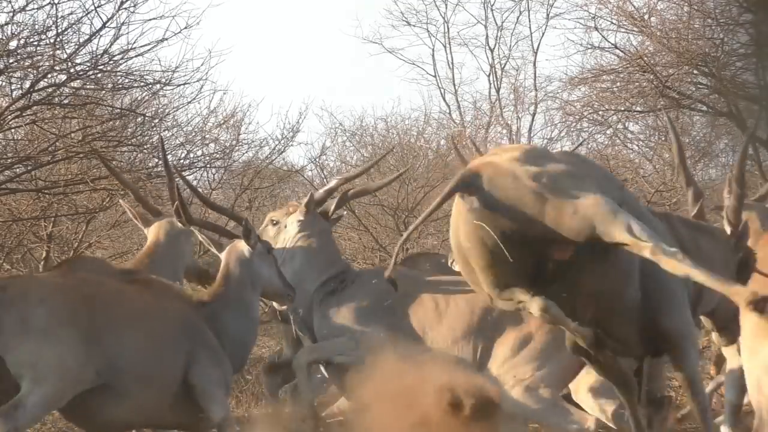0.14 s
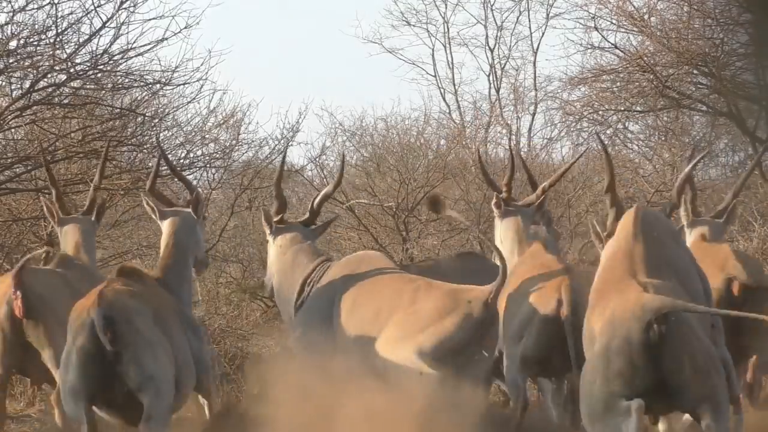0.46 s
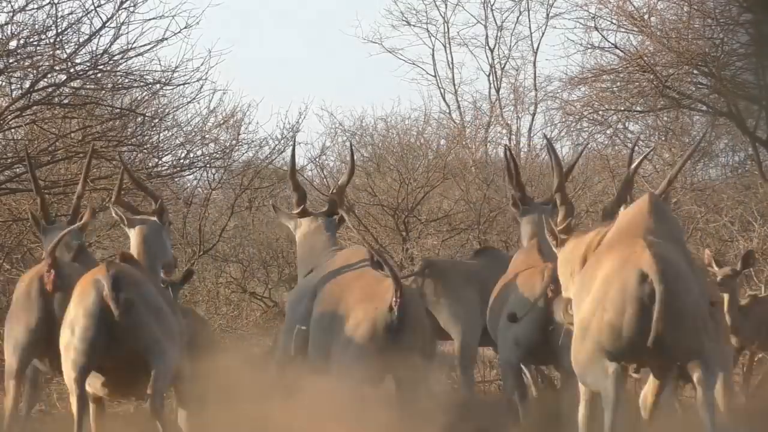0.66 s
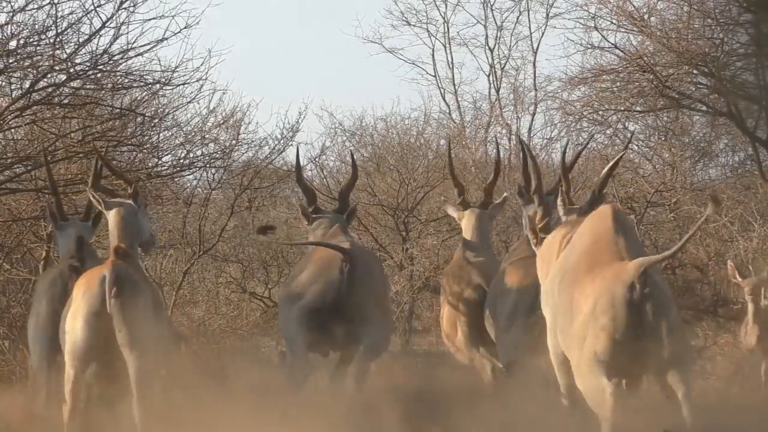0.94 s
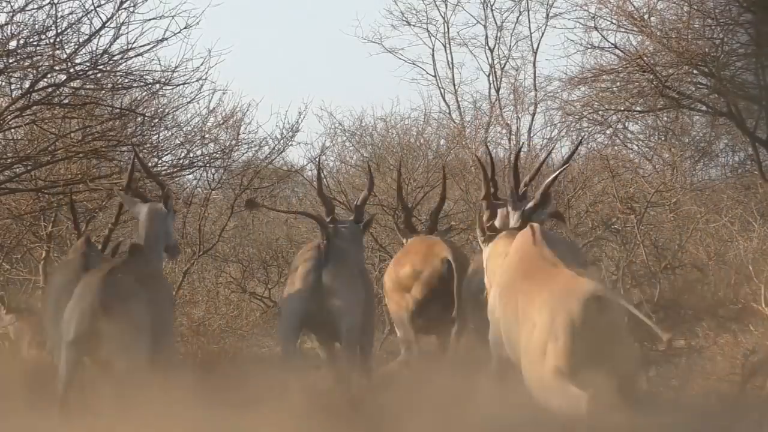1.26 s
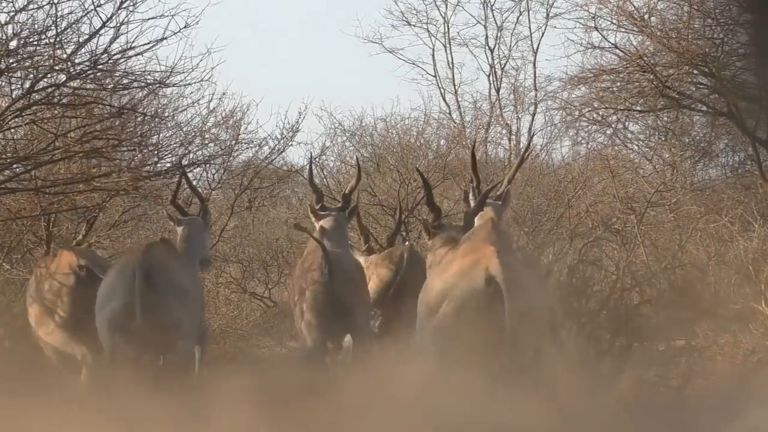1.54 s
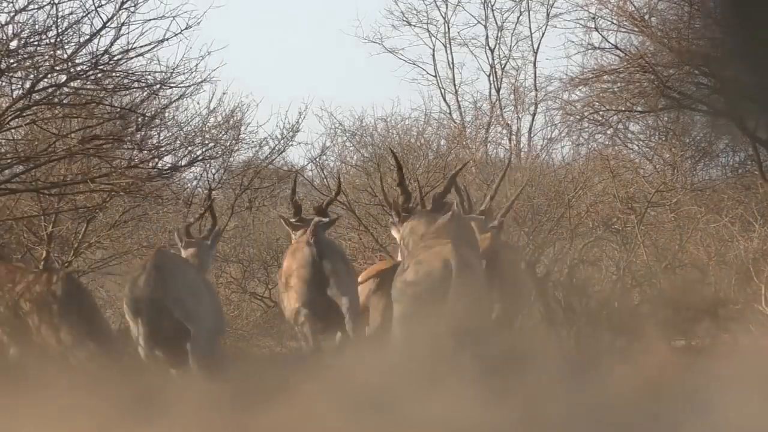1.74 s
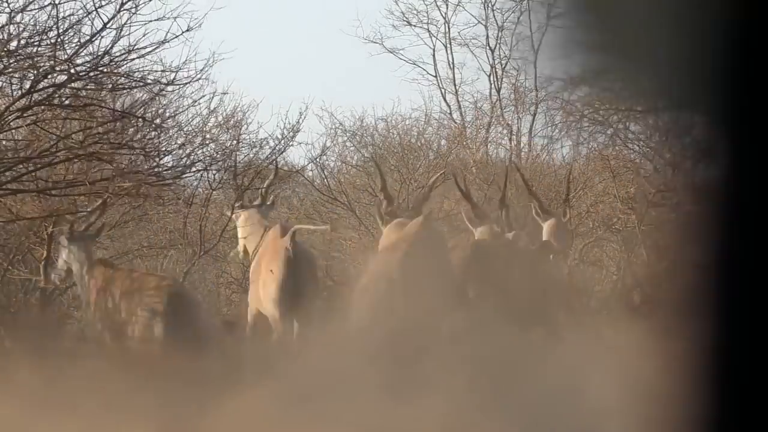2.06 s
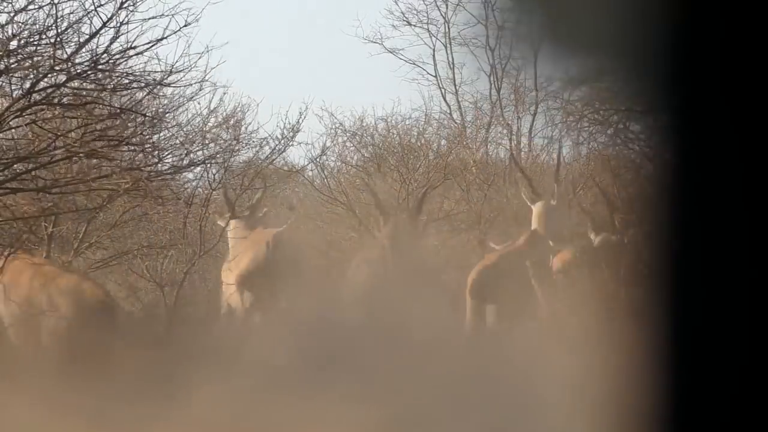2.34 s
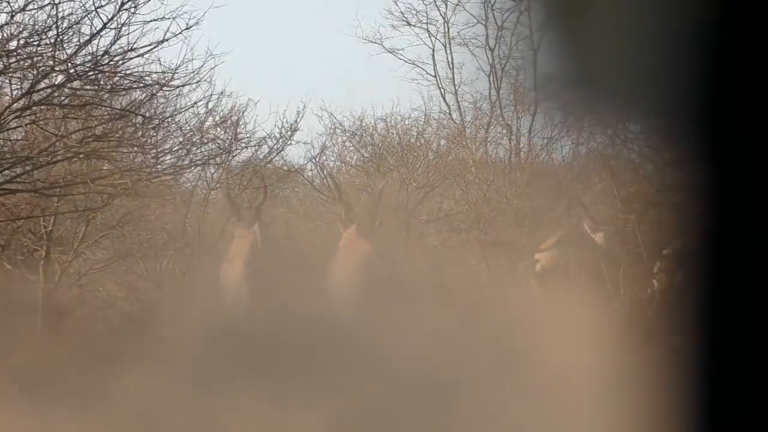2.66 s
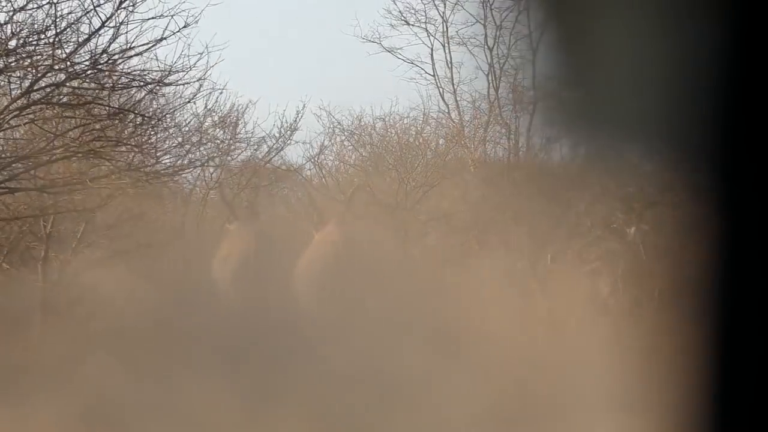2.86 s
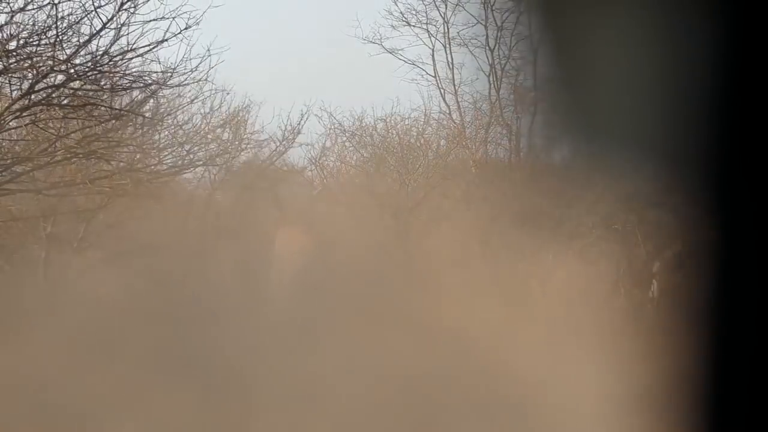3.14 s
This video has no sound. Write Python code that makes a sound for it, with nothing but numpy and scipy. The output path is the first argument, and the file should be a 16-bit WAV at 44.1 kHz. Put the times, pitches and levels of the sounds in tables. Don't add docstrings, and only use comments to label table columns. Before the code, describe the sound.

A herd of large antelope stampedes off through dry bush: dense low hoof thuds, crackling brush and snapping twigs, one sharp loud branch crack early on, then thinning rustle and faint bird chirps; close outdoor stereo microphone with light hiss.

```python
import sys
import numpy as np
from scipy import signal
from scipy.io import wavfile

SR = 44100
rng = np.random.default_rng(int(sys.argv[2]) if len(sys.argv) > 2 else 0)


def field_ratio(decibels):
    return 10 ** (np.asarray(decibels, dtype=float) / 20)


def master_out(mix):
    frames = np.transpose(np.atleast_2d(mix))
    ceiling = np.clip(frames, -1, 1)
    pcm = np.round(ceiling * 32767).astype(np.int16)
    wavfile.write(sys.argv[1], SR, pcm)


N = 145530

# start in seconds, boom level in dB, knock level in dB.
HOOF_FALLS = [(0.051, -40, -56), (0.194, -40, -36), (0.323, -33, -43), (0.374, -39, -40.5),
              (0.405, -42, -52), (0.463, -32.5, -31), (0.505, -39, -39), (0.576, -61, -36.5),
              (0.656, -34.5, -51), (0.782, -43, -58), (0.9, -51, -40), (0.98, -45, -42), (1.062, -34, -54),
              (1.16, -47, -43), (1.21, -35, -43), (1.26, -29, -36), (1.407, -58, -39), (1.483, -33.5, -43),
              (1.548, -35, -36), (1.637, -31, -48), (1.675, -35.5, -44.5), (1.766, -43, -49),
              (1.845, -46, -43), (1.885, -46, -40), (1.92, -42, -40), (1.973, -50, -41),
              (2.042, -48, -37.5), (2.11, -36, -53), (2.235, -52, -47), (2.45, -55, -46),
              (2.596, -52, -40.5), (2.74, -55, -44), (2.99, -55, -45), (3.143, -55, -44)]
# pitch in Hz, level in dB, decay by 60 dB in seconds.
CRUST_MODES = [(174, -1, .06), (206, 2, 0.065), (250, -2.5, .045), (323, -11.5, 0.018), (398, -21, 0.03)]
# time in seconds, level in dB.
TRAMPLE_LEVEL = [
    (0.0, -44.5),
    (1.81, -43.5),
    (3.3, -48),
]
# start in seconds, level in dB.
BRANCH_CRACKS = [
    (0.762, -26),
    (.7664, -12),
    (0.7673, -15.5),
    (0.7696, -37),
    (0.777, -23.5),
]
# pitch in Hz, level in dB, decay by 60 dB in seconds.
BRANCH_RINGING = [(1300, -11, .005), (1900, -6, .005), (2480, -5, .005), (3100, -3, .006), (4350, -3, .01),
                  (5100, -8, .005), (5680, -6, .005), (6340, 0, .007), (7560, -9, .006), (9200, -9, .003),
                  (10700, -13, .003), (14000, -22, .002)]
# start in seconds, peak level in dB, pitch in Hz, level of the bright edge in dB.
TWIG_SNAPS = [(0.1036, -35, 2140, -26), (0.1766, -35, 1210, -10), (0.194, -32.5, 1460, -14),
              (0.3016, -34, 2060, -13), (0.3683, -33, 2980, -8), (0.4878, -32, 2290, -20),
              (0.4955, -29.5, 2360, -6), (0.5736, -30, 2900, -25), (0.598, -34, 2610, -17),
              (0.6871, -29.5, 2470, -8), (1.0188, -27.5, 2200, -25), (1.074, -27, 1800, -8),
              (1.1765, -34, 3500, -25), (1.198, -31, 2500, -15), (1.264, -31.5, 2300, -24),
              (1.4357, -21.5, 1820, -21), (1.5271, -30, 1080, -15), (1.5499, -23.5, 2820, -22),
              (1.6225, -25, 2930, -34), (1.702, -24, 1530, -26), (1.7753, -24, 2280, -24),
              (1.8347, -32, 1290, -15), (1.945, -24, 2330, -23), (2.2307, -30.5, 1430, -21),
              (2.4086, -44, 1240, -30), (2.7267, -30, 2540, -23), (2.8614, -35, 985, -29),
              (2.907, -32, 2200, -28.5), (3.0353, -35.5, 1280, -21)]
# start in seconds, peak level in dB, pitch in Hz.
STONE_TICKS = [(.0687, -37, 1560), (.113, -37, 4000), (.2708, -33, 1660), (.3267, -37, 8690),
               (.3676, -34, 4780), (.4948, -25, 6340), (.6863, -26, 6380), (.7068, -31, 2360),
               (.732, -36, 9500), (.9448, -34, 1240), (1.0252, -28, 3700), (1.034, -28, 2900),
               (1.043, -30, 3200), (1.0745, -28, 3000), (1.079, -27, 1400), (1.111, -35, 6700),
               (1.1815, -29, 1900), (1.1902, -19, 3290), (1.1905, -23, 5600), (1.22, -31, 3400),
               (1.255, -31, 2900), (1.3418, -33, 6590), (1.3942, -31, 3230), (1.44, -27, 1050),
               (1.454, -29, 2000), (1.4651, -33, 5040), (1.5279, -30, 8730), (1.5873, -28, 2050),
               (1.6142, -35, 9000), (1.6222, -24, 3400), (1.6245, -27, 1500), (1.675, -31, 1400),
               (1.807, -31, 1300), (1.853, -31, 2100), (1.8736, -33, 5640), (1.88, -29, 1250),
               (1.896, -29, 1150), (1.9445, -28, 3900), (2.0018, -29, 3380), (2.0393, -30, 1560),
               (2.1321, -34, 8100), (2.3431, -36, 3400), (2.3885, -32, 2060), (2.5546, -35, 8570),
               (2.728, -31, 1150), (2.83, -27, 3550), (2.8305, -33, 5500), (2.832, -36, 1200),
               (2.8799, -33, 2230), (3.0091, -31, 2370), (3.018, -33, 3300), (3.1033, -38, 4850),
               (3.1443, -35, 3590), (3.1737, -34, 2340), (3.2, -34, 2500), (3.294, -33, 1400)]
# start in seconds, length in seconds, start pitch in Hz, end pitch in Hz, level in dB.
BIRD_CHIRPS = [(1.905, .034, 3050, 2200, -43), (2.305, .02, 3050, 2150, -44), (2.46, .026, 2900, 1950, -44),
               (2.517, .016, 3000, 2350, -45), (2.537, .024, 2850, 1950, -44.5),
               (2.572, .018, 2100, 1780, -45), (2.652, .045, 4300, 2650, -50),
               (2.685, .05, 2720, 2580, -49.5), (2.875, .025, 3950, 3500, -53),
               (2.912, .04, 2300, 1300, -48), (3.005, .018, 2900, 2200, -47), (3.215, .03, 2950, 2350, -47)]
# time of the peak in seconds, level in dB.
LEAF_SWEEPS = [(.09, -46), (.375, -45.5), (.51, -42), (1.085, -47), (1.22, -50), (1.47, -43.5), (1.55, -49),
               (1.76, -45), (1.88, -42), (1.97, -47), (2.135, -44.5), (2.555, -46.5), (3.02, -53)]
# time in seconds, level in dB.
BRUSH_LEVEL = [
    (0.0, -46),
    (1.76, -41.5),
    (2.1, -43),
    (3.3, -45.5),
]
# frequency in Hz, level in dB per Hz.
RUSTLE_COLOUR = [(400, -28), (620, -7), (800, -18.5), (1100, 0.5), (2500, -0.5), (4200, -5.5),
                 (6500, -15.5), (12000, -14)]
# time in seconds, level in dB.
DUST_LEVEL = [
    (0.0, -55.5),
    (1.9, -56),
    (2.7, -58.5),
    (3.3, -59.5),
]
# frequency in Hz, level in dB per Hz.
AIR_COLOUR = [(30, -29), (100, 6), (500, 0), (800, -16), (4000, -30.5), (9000, -4), (14000, -23),
              (17000, -34)]
# frequency in Hz, share from 0 to 1.
STEREO_LIKENESS = [(40, 0.74), (200, 0.6), (800, 0.94), (2500, 0.64), (5000, 0.83), (9000, 1),
                   (14000, 0.92)]

BOOM_HZ, BOOM_T60_S, BOOM_DB, KNOCK_DB = 91.7, 0.13, 1.5, 3
PUSH_S, BOOM_PAN_DB = 0.009, -1.4
FALLS_PER_S, FALL_SPREAD_DB, HERD_BOOM_DB, HERD_KNOCK_DB = 400, 2.2, -6.5, -3.5
BRANCH_PAN_DB, BRANCH_WET_DB = -1.3, -7.5
SPLINTERS_PER_S, SPLINTER_DB, SPLINTER_T60_S = 2800, -25.5, 0.15
SHRED_DB, SHRED_T60_S, SHRED_LOW_HZ, SHRED_HIGH_HZ = -30, 0.2, 2600, 8500
SNAP_CYCLES, SNAP_DB, SPLIT_S, SPLIT_LOSS_DB = 14.0, 2, 0.002, 8
CRUNCH_DB, CRUNCH_T60_S = -15, 0.16
BRIGHT_HZ, BRIGHT_DB, EDGE_T60_S = 8000, -3, 0.02
TICK_CYCLES, TICK_T60_S, TICK_DB, TICK_WET_DB = 15.0, 0.006, 1.5, -14
TICK_TILT_DB, REBOUND_S, REBOUND_DB = 3.0, 0.0012, -2
SWISH_RISE_S, SWISH_FALL_S, SWISH_LOW_HZ, SWISH_HIGH_HZ = 0.011, 0.028, 3930, 10500
CRACKLE_PER_S, CRACKLE_DB, CRACKLE_CYCLES, CRACKLE_SPREAD_DB = 1000, -5.5, 7.0, 3.0
RUSTLE_DB = -2
SCRUB_T60_S, SCRUB_DB, SCRUB_SIDE_DB, SCRUB_CUT_HZ, SCRUB_SIDE_HZ = 0.2, -8, -2, 9000, 4600
HOLLOW_HZ, TOP_HZ = 970, 15750


def rms_one(x):
    return x / np.sqrt(np.mean(x ** 2) + 1e-20)


def in_time(rows):
    return np.interp(np.arange(N) / SR, *np.transpose(rows))


def at_hz(points, hz):
    points = np.array(points)
    return np.interp(np.log(hz), np.log(points[:, 0]), points[:, 1])


def drift(rate):
    r = np.exp(-80 * np.pi * rate / SR)
    draws = rng.standard_normal(N // 40 + 2002)
    slow = signal.lfilter([1], [1, -2 * r, r * r], draws)[2000:]
    return np.interp(np.arange(N) / 40, np.arange(len(slow)), rms_one(slow))


def ring(clicks, hz, t60):
    r = field_ratio(-60 / (t60 * SR))
    w = 2 * np.pi * hz / SR
    return signal.lfilter([0, np.sin(w)], [1, -2 * r * np.cos(w), r * r], clicks + 1e-18)


def cut(x, hz, kind, order):
    return signal.sosfilt(signal.butter(order, hz, kind, fs=SR, output="sos"), x)


def train(s, gains):
    return np.bincount((np.asarray(s) * SR).astype(int), gains, N + SR)[:N]


def chance(per_s, spread_db):
    hits = rng.random(N) < per_s / SR
    return hits * field_ratio(spread_db * np.minimum(rng.exponential(1, N), 4))


def either_way():
    return rng.choice([-1, 1], N)


def grainy_gain(length, grain, spread_db):
    jumps = spread_db * rng.standard_normal(length // grain + 1)
    return field_ratio(jumps.repeat(grain)[:length])


def banded_noise(colour, patchy_db):
    out, together = 0, drift(9.0)
    edges = 25 * 2 ** np.arange(0, 9.6, 0.5)
    white = rng.standard_normal((2, 2, N))
    for k, (low, high) in enumerate(zip(edges, edges[1:])):
        band = signal.butter(2, [low, high], "band", fs=SR, output="sos")
        mid, side = signal.sosfilt(band, white[k % 2])
        hz = np.sqrt(low * high)
        alike = np.clip(at_hz(STEREO_LIKENESS, hz), 0, 1)
        flicker = 0.55 * together + 0.39 * drift(33)
        gain = field_ratio(at_hz(colour, hz) + patchy_db * flicker)
        out = out + gain * (np.sqrt(1 + alike) * mid + np.sqrt(1 - alike) * side * [[1], [-1]])
    return rms_one(out)


def earth(boom, knock):
    push = np.hanning(int(PUSH_S * SR))
    boom = np.convolve(boom, push / push.sum())[len(push) // 2:][:N]
    low = ring(boom, BOOM_HZ, BOOM_T60_S) + 0.5 * ring(boom, 0.77 * BOOM_HZ, 0.061)
    low = cut(cut(low, 142, "low", order=2), 53, "high", order=2)
    high = sum(field_ratio(db) * ring(knock, hz, t60) for hz, db, t60 in CRUST_MODES)
    high = cut(cut(high, 469, "low", order=4), 216, "high", order=2)
    return low * field_ratio([[BOOM_PAN_DB], [-BOOM_PAN_DB]]), -high


def hooves():
    s, boom_db, knock_db = np.transpose(HOOF_FALLS)
    boom, knock = earth(-train(s, field_ratio(boom_db + BOOM_DB)), -train(s, field_ratio(knock_db + KNOCK_DB)))
    boom_pushes = chance(FALLS_PER_S, FALL_SPREAD_DB) * either_way()
    knock_clicks = chance(FALLS_PER_S, FALL_SPREAD_DB) * either_way()
    far_boom, far_knock = earth(boom_pushes, knock_clicks)
    _, aside = earth(np.zeros(N), chance(200, 3.1) * either_way())
    herd = field_ratio(HERD_BOOM_DB) * rms_one(far_boom) + field_ratio(HERD_KNOCK_DB) * rms_one(far_knock)
    herd = herd + field_ratio(-12.5) * rms_one(aside) * [[1], [-1]]
    return boom + knock + field_ratio(in_time(TRAMPLE_LEVEL)) * herd


def branch():
    s, db = np.transpose(BRANCH_CRACKS)
    age = np.arange(N) / SR - s[1]
    since = np.maximum(age, 0)
    torn = np.where(age > 0, 1, field_ratio(-6) * (age > s[0] - s[1]))
    tear = torn * field_ratio(SPLINTER_DB - 60 * since / SPLINTER_T60_S)
    shred = cut(rng.standard_normal(N), SHRED_LOW_HZ, "high", order=1)
    shred = rms_one(cut(shred, SHRED_HIGH_HZ, "low", order=2))
    out = shred * (age > 0) * field_ratio(SHRED_DB - 60 * since / SHRED_T60_S)
    for k, (hz, level_db, t60) in enumerate(BRANCH_RINGING):
        cracks = train(s, field_ratio(db - 3) * rng.uniform(1.0, 1.32, len(s)))
        splinters = tear * chance(SPLINTERS_PER_S, 3.9) * either_way() / 3
        out = out + field_ratio(level_db) * (-1) ** k * ring(cracks + splinters, hz, t60)
    return out


def snaps():
    out = np.zeros(N + SR)
    t = np.arange(SR // 6) / SR
    lucks = rng.uniform(0.7, 1.2, (len(TWIG_SNAPS), 3))
    for (s, db, hz, bright_db), luck in zip(TWIG_SNAPS, lucks):
        split_times = SPLIT_S * np.cumsum([0, *luck[:2]])
        steps = train(split_times, field_ratio(SNAP_DB - SPLIT_LOSS_DB * np.arange(3)))[:len(t)]
        body = ring(steps, hz, SNAP_CYCLES / hz) - field_ratio(-5) * ring(steps, 1.57 * hz * luck[2], 0.0029)
        grit = rng.standard_normal((2, len(t))) * grainy_gain(len(t), 40, 4.5)
        crunch = cut(grit[0], 0.5 * hz + 300, "high", order=2)
        crunch = rms_one(cut(crunch, 1.13 * hz + 1500, "low", order=2))
        edge = cut(grit[1], 5000, "high", order=2)
        edge = rms_one(cut(edge, BRIGHT_HZ, "low", order=2))
        crunch = crunch * field_ratio(CRUNCH_DB - 60 * t / CRUNCH_T60_S)
        edge = edge * field_ratio(bright_db + BRIGHT_DB - 60 * t / EDGE_T60_S)
        out[int(s * SR):][:len(t)] += field_ratio(db) * (body + crunch + edge)
    return out[:N]


def ticks():
    out = np.zeros(N + SR)
    lucks = rng.uniform(0.7, 1.3, (len(STONE_TICKS), 2))
    for (s, db, hz), luck in zip(STONE_TICKS, lucks):
        rebound_s = np.round(REBOUND_S * luck[0] * hz) / hz
        steps = train([0, rebound_s], field_ratio([0, REBOUND_DB]))[:SR // 20]
        level_db = db + TICK_DB + TICK_TILT_DB * min(0, np.log2(hz / 3300))
        tick = ring(steps, hz, min(TICK_T60_S, TICK_CYCLES / hz))
        out[int(s * SR):][:len(steps)] += field_ratio(level_db) * tick
    return out[:N]


def crackle(brush_db):
    clumps = field_ratio(2 * drift(20))
    clicks = chance(CRACKLE_PER_S * clumps, CRACKLE_SPREAD_DB) * either_way()
    pitches = np.geomspace(1050, 7500, 18)
    dealt = rng.integers(0, 18, N)
    rings = 0
    for k, hz in enumerate(pitches):
        gain = field_ratio(at_hz(RUSTLE_COLOUR, hz) + 3.74 * np.log2(hz))
        rings = rings + gain * ring(clicks * (dealt == k), hz, CRACKLE_CYCLES / hz)
    return field_ratio(brush_db + CRACKLE_DB) * rms_one(rings)


def scrub(x):
    t = np.arange(SR // 2) / SR
    noise = cut(rng.standard_normal((2, len(t))), SCRUB_CUT_HZ, "low", order=1)
    mid, side = noise * field_ratio(-60 * t / SCRUB_T60_S)
    side = cut(cut(side, SCRUB_SIDE_HZ, "low", order=2), 1600, "high", order=1)
    tail = mid + field_ratio(SCRUB_SIDE_DB) * side * [[1], [-1]]
    return signal.fftconvolve(x[None], tail / np.sqrt(np.sum(mid ** 2)), axes=1)[:, :N]


def swishes():
    t, level = np.arange(N) / SR, 0
    for s, db in LEAF_SWEEPS:
        rise = np.exp(-((t - s) / SWISH_RISE_S) ** 2)
        fall = np.exp(-np.abs(t - s) / SWISH_FALL_S)
        level = level + field_ratio(db) * np.where(t < s, rise, fall)
    grit = rng.standard_normal(N) * grainy_gain(N, 64, 2.6)
    hiss = cut(cut(grit, SWISH_LOW_HZ, "high", order=1), SWISH_HIGH_HZ, "low", order=3)
    return level * rms_one(hiss)


def bird():
    out = np.zeros(N)
    for s, length, top_hz, end_hz, db in BIRD_CHIRPS:
        u = np.linspace(0, 1, int(length * SR))
        hz = end_hz + (top_hz - end_hz) * (1 - u) ** 1.23
        swell = np.sqrt(2) * np.sin(np.pi * u) ** 0.5
        out[int(s * SR):][:len(u)] += field_ratio(db) * swell * np.sin(2 * np.pi * np.cumsum(hz) / SR)
    return out * field_ratio(2.6 * drift(300) - 0.8)


def rustle(brush_db):
    return field_ratio(brush_db + RUSTLE_DB) * banded_noise(RUSTLE_COLOUR, patchy_db=2.5)


def air():
    return field_ratio(in_time(DUST_LEVEL)) * banded_noise(AIR_COLOUR, patchy_db=2.5)


def scene():
    brush_db = in_time(BRUSH_LEVEL)
    near, stones = branch(), ticks()
    sticks = snaps() + crackle(brush_db)
    wander = field_ratio(2 * drift(20) * [[1], [-1]])
    wood = near * field_ratio([[BRANCH_PAN_DB], [-BRANCH_PAN_DB]]) + (sticks + stones) * wander
    wood = wood + scrub(field_ratio(SCRUB_DB) * sticks + field_ratio(TICK_WET_DB) * stones + field_ratio(BRANCH_WET_DB) * near)
    wood = cut(wood, HOLLOW_HZ, "high", order=6)
    return hooves() + wood + swishes() + bird() + rustle(brush_db) + air()


def top_cut(x):
    return signal.sosfilt(signal.butter(12, 16050, fs=SR, output="sos"), x)


def record(dry):
    steep = signal.cheby2(20, 60, TOP_HZ, fs=SR, output="sos")
    mix = signal.sosfilt(steep, dry)
    return top_cut(mix)


dry = scene()
out = record(dry)
master_out(out)
```